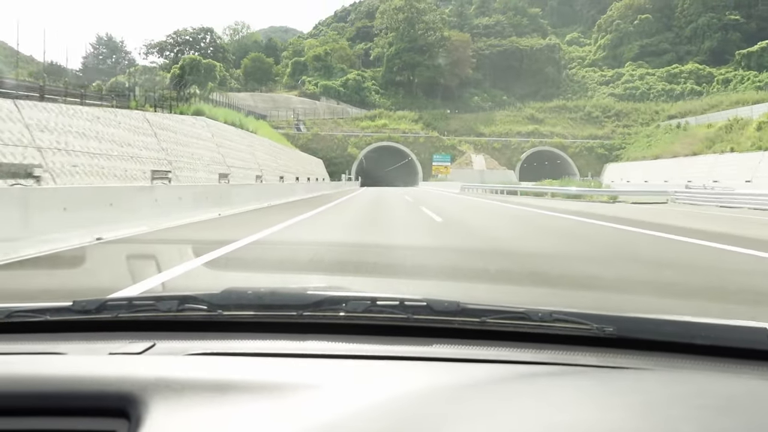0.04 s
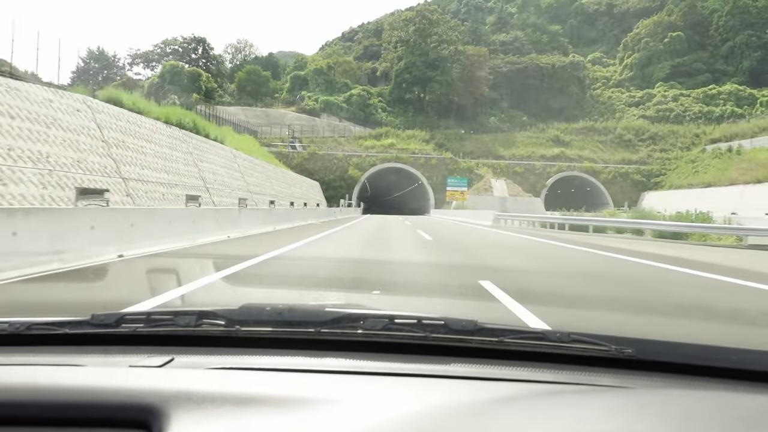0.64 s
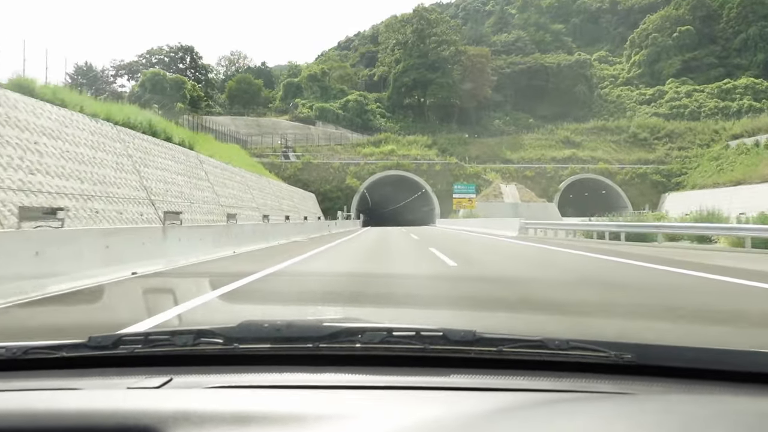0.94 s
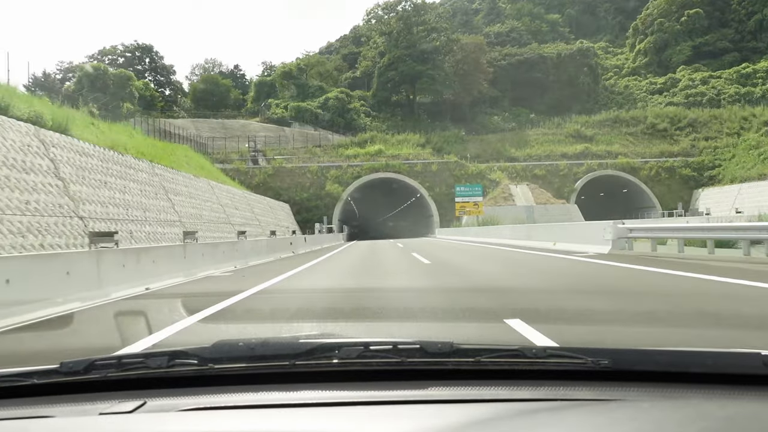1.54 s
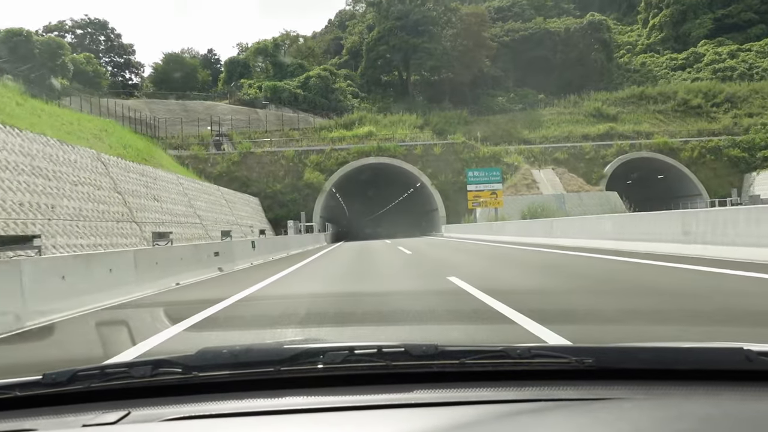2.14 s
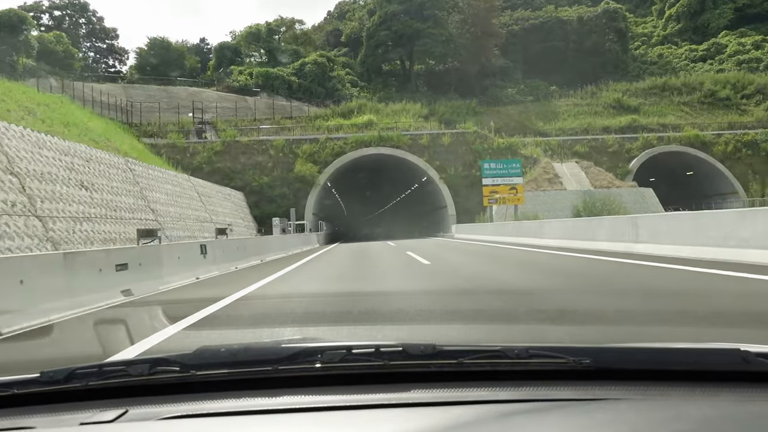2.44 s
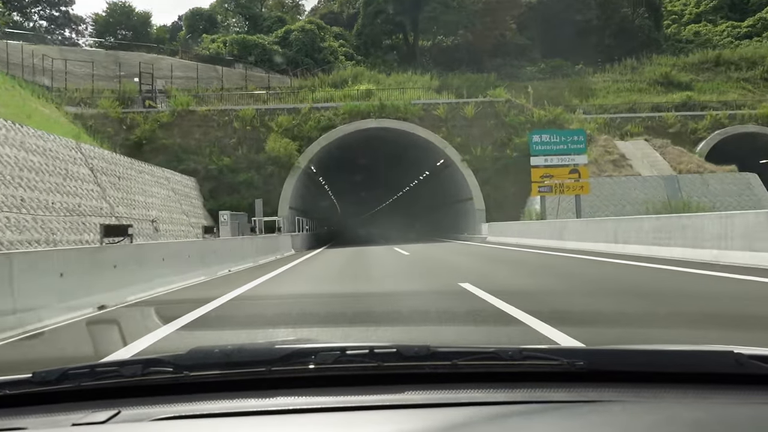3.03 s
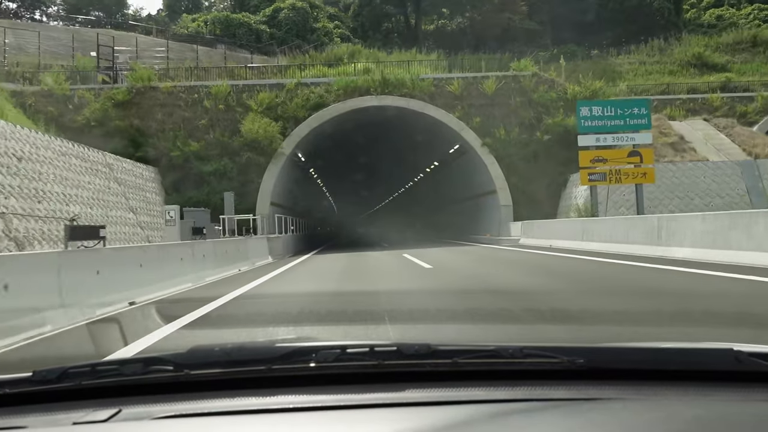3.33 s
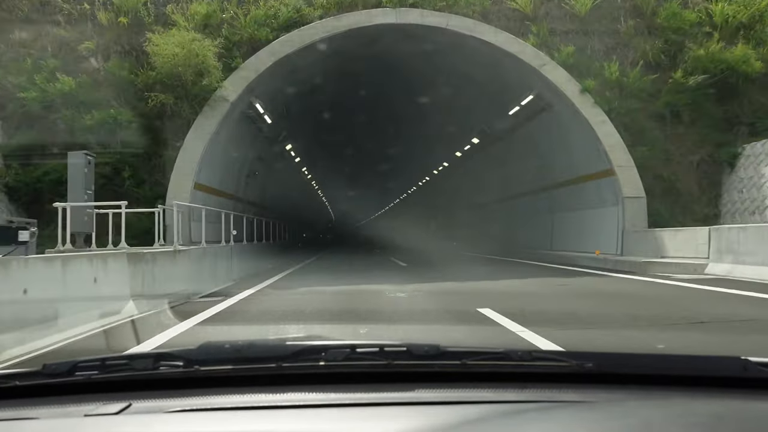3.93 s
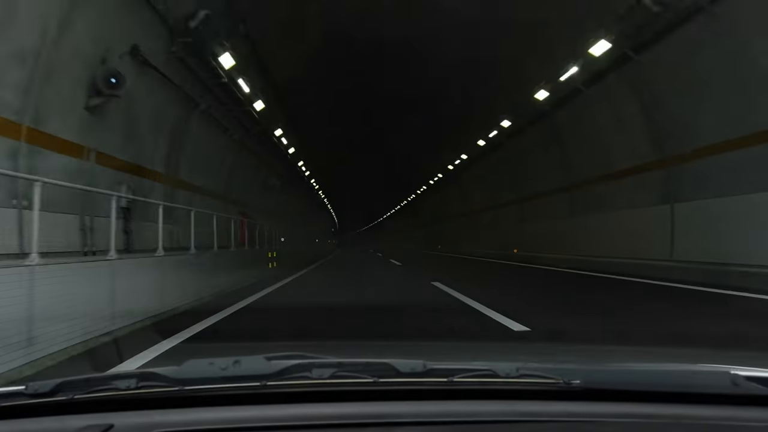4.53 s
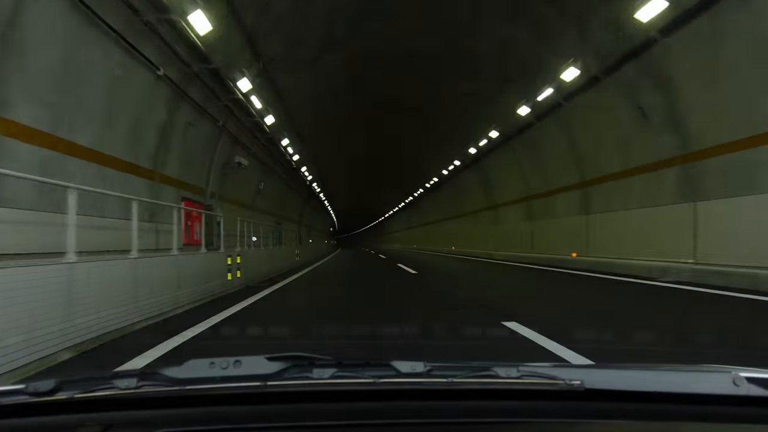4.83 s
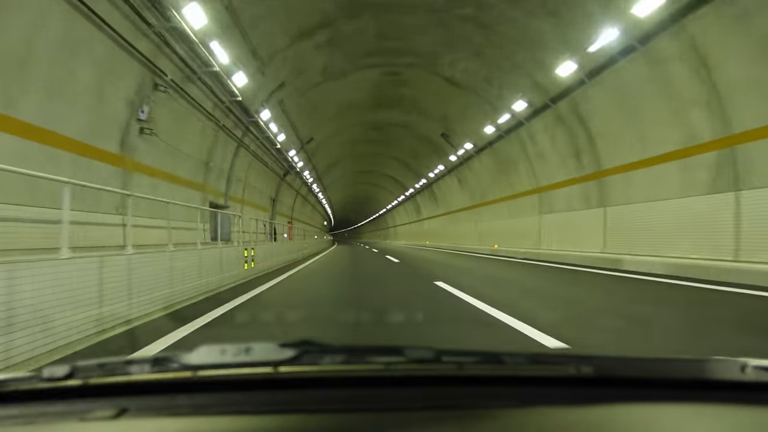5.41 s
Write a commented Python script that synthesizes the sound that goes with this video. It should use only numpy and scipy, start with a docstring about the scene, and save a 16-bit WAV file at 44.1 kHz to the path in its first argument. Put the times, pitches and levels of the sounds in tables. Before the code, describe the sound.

Inside a car at highway speed, engine hum, road rumble and wind hiss continue as a higher tyre hum rises in a tunnel.

```python
"""Inside a car at highway speed, entering a tunnel.
From the start air hisses past the windscreen, the engine hums, and the road shakes body and tyres.
At 1.65 s the asphalt coarsens; near 2 s the engine load eases; ripples then excite the air in the tyres.
From 4.25 s tunnel walls return the ringing of the treads as a hum near 1 kHz, and the hiss grows.
From 4.6 s the road noise dips about 2 dB; the hum swells once near 5.2 s, then continues."""
import sys
import numpy as np
from scipy import signal
from scipy.fft import rfft, irfft
from scipy.io import wavfile
from scipy.ndimage import uniform_filter1d

SR = 44100
rng = np.random.default_rng(int(sys.argv[2]) if len(sys.argv) > 2 else 0)


def store_pcm(level_fs):
    """Save levels as 16-bit WAV."""
    pcm = np.round(np.clip(level_fs, -1, 1) * 32767).astype(np.int16)
    wavfile.write(sys.argv[1], SR, np.atleast_2d(pcm).T)


N = 250047
TIME_S = np.arange(N) / SR
FREQS_HZ = np.maximum(np.arange(N // 2 + 1) * SR / N, 1)

COARSE_START_S, COARSE_FADE_S = 1.65, 0.14
TUNNEL_START_S, TUNNEL_FADE_S = 4.25, 1
ROAD_DIP_START_S, ROAD_DIP_FADE_S = 4.62, 0.23


def from_db(db):
    """Decibels to gain."""
    return 10 ** (np.asarray(db) / 20)


def unit_rms(x):
    """Scale to rms 1."""
    return x / np.sqrt(np.mean(x ** 2) + 1e-20)


def curve(rows):
    """Linear interpolation of (time [s], value) rows."""
    times_s, values = np.transpose(rows)
    return np.interp(TIME_S, times_s, values)


def fade_in(start_s, length_s):
    """Smooth step, 0 to 1."""
    return np.sin(np.pi / 2 * np.clip((TIME_S - start_s) / length_s, 0, 1)) ** 2


def bump(at_s, sigma_s):
    """Gaussian pulse, height 1."""
    return np.exp(-.5 * ((TIME_S - at_s) / sigma_s) ** 2)


def drift(corner_hz):
    """Low-passed noise, rms 1."""
    return unit_rms(irfft(rfft(rng.standard_normal(N)) / (1 + (FREQS_HZ / corner_hz) ** 2), N))


def resonant_noise(spectrum, modes=()):
    """Random forcing through a broad spectrum and narrow resonances, rms 1."""
    hz, level_db = np.transpose(spectrum)
    colour_db = np.interp(np.log(FREQS_HZ), np.log(hz), level_db)
    for centre_hz, width_hz, lift_db in modes:
        colour_db += lift_db / (1 + (2 * (FREQS_HZ - centre_hz) / width_hz) ** 2)
    rolloff = (np.minimum(FREQS_HZ / hz[0], 1) * np.minimum(hz[-1] / FREQS_HZ, 1)) ** 2
    return unit_rms(irfft(rfft(rng.standard_normal(N)) * from_db(colour_db) * rolloff, N))


def enclosure():
    """Open road 0, inside the tunnel 1."""
    return fade_in(TUNNEL_START_S, TUNNEL_FADE_S)


def road_steps_db(coarse_db, dip_db):
    """Cumulative level steps: coarse asphalt, then a level dip in the tunnel."""
    return (coarse_db * fade_in(COARSE_START_S, COARSE_FADE_S)
            + dip_db * fade_in(ROAD_DIP_START_S, ROAD_DIP_FADE_S))


def wind_hiss(open_db=-49, tunnel_lift_db=5, flutter_db=1.03, treble_hz=10000):
    """Eddies make the air hiss flutter and spit; louder, steadier and duller in the tunnel."""
    # head wind gusts: (time [s], level change [dB])
    gusts = [(0.2, 1.1), (0.85, -1.7), (1.15, 0.7), (1.5, -1.7), (2.9, 2.1), (3.85, 1.1), (4.3, 0)]
    # brief spits of the air flow: (time [s], rise [dB])
    spits = [(1.163, 4), (1.208, 3), (2.29, 4.5), (2.803, 3), (2.913, 4)]
    # air flow noise: (frequency [Hz], density [dB])
    spectrum = [(1500, 0), (2500, 4), (3000, 2), (3400, -.7), (4100, -1.5), (5100, -3.4), (6200, -.8),
                (7500, .1), (8400, -2.2), (8900, -5.4), (10000, -7.7), (12000, -13), (14000, -17),
                (15600, -22)]
    hiss = resonant_noise(spectrum)
    treble = irfft(rfft(hiss) * (1 - 1 / (1 + (FREQS_HZ / treble_hz) ** 8)), N)
    shelter = 0.37 * enclosure()
    spit_db = sum(rise_db * bump(at_s, sigma_s=0.0048) for at_s, rise_db in spits)
    level_db = open_db + curve(gusts) + tunnel_lift_db * enclosure() + spit_db
    level_db += flutter_db * (1 - shelter) * drift(corner_hz=28)
    extra_treble = from_db(0.5 * spit_db) - 1 - shelter
    return from_db(level_db) * (hiss + extra_treble * treble)


def engine_hum(coast_hz=92.7, pull_hz_per_db=0.1, wander_hz=0.39, waver_db=0.9, octave_db=-17):
    """Firing tone and weak octave boom in the cabin; level and pitch sink as the load eases."""
    # firing tone under changing load: (time [s], level [dB])
    load = [(0, -22.3), (.6, -19.7), (1.6, -27), (1.98, -23), (2.2, -31.5), (5.67, -34.5)]
    level_db = curve(load)
    firing_hz = coast_hz + pull_hz_per_db * (level_db - level_db.min())
    firing_hz += wander_hz * drift(corner_hz=4.0)
    phase = 2 * np.pi * np.cumsum(firing_hz) / SR
    tone = np.sqrt(2) * (np.sin(phase) + from_db(octave_db) * np.sin(2 * phase))
    return from_db(level_db + waver_db * drift(corner_hz=4.3)) * tone


def body_shake(level_db=-19.2, compression=0.22):
    """The sprung body trembles at tens of hertz; dampers restrain the larger swings."""
    # body vibration: (frequency [Hz], density [dB])
    spectrum = [(5, -26), (13, -2), (22, -2), (28, 1.5), (42, -4), (53, -.5), (72, -9.5), (100, -13),
                (150, -30)]
    shake = resonant_noise(spectrum)
    local_power = uniform_filter1d(shake ** 2, size=SR // 12)
    return from_db(level_db) * unit_rms(shake / local_power ** (compression / 2))


def road_rumble(level_db=-22.5):
    """Asphalt texture shakes the floor pan, which drives the cabin modes."""
    # floor pan rumble: (frequency [Hz], density [dB])
    spectrum = [(60, -12.5), (105, -1), (135, -1.5), (180, -4.5), (218, -7), (320, -7), (440, -9),
                (560, -12.5), (750, -19.5), (1500, -59)]
    # cabin resonances: (centre [Hz], width [Hz], lift [dB])
    modes = [(143.3, 15, 5), (202, 11, 3.5), (388, 54, 1.5), (484, 21, 3.5)]
    road_db = road_steps_db(coarse_db=1.27, dip_db=-2.5)
    return from_db(level_db + road_db) * resonant_noise(spectrum, modes)


def tyre_cavities(level_db=-27.0, ripple_db=4, ripple_start_s=2.23, ripple_end_s=3.06):
    """The air ring in each tyre resonates near 250 Hz, most on rippled road."""
    # tyre air band: (frequency [Hz], density [dB])
    spectrum = [(215, -10), (235, 0), (280, 0), (310, -12)]
    # cavity resonance, split by rolling: (centre [Hz], width [Hz], lift [dB])
    modes = [(236, 11, 13), (259, 11, 12), (278, 12, 9.5)]
    rippled = fade_in(ripple_start_s, length_s=0.16) - fade_in(ripple_end_s, length_s=0.16)
    road_db = road_steps_db(coarse_db=-0.77, dip_db=-2.2) + ripple_db * rippled
    return from_db(level_db + road_db) * resonant_noise(spectrum, modes)


def tread_roar(level_db=-32.0, patchiness_db=0.83):
    """Tread blocks slap the road and ring, varying by patch, surging on meeting coarse asphalt."""
    # tread slap: (frequency [Hz], density [dB])
    spectrum = [(350, -34), (620, -2.5), (760, -1), (950, -6.5), (1070, -4.5), (1220, -14.5), (1750, -14.5),
                (2450, -23), (2900, -28), (3300, -34.5), (5000, -45)]
    # tread resonances: (centre [Hz], width [Hz], lift [dB])
    modes = [(661, 37, 7.4), (749, 25, 6.5), (886, 10.4, 9.3), (1328, 74, 6.9), (1640, 54, 2.1),
             (1960, 41, 2.9), (2310, 70, 2)]
    road_db = road_steps_db(coarse_db=1.5, dip_db=-1.5) + patchiness_db * drift(corner_hz=13)
    surge_db = 0.5 * bump(COARSE_START_S + COARSE_FADE_S, sigma_s=0.095)
    return from_db(level_db + road_db + surge_db) * resonant_noise(spectrum, modes)


def tunnel_hum(level_db=-22.5, swell_db=3.3, waver_db=0.43):
    """The walls return the pipe tones of the tread grooves, smeared into a hum near 1 kHz."""
    # reflected tyre noise: (frequency [Hz], density [dB])
    spectrum = [(560, -28), (790, -15.5), (870, -2.5), (1070, -2), (1170, -9), (1420, -11.5), (1800, -14.3),
                (2150, -21), (2650, -25.8), (3300, -36), (4500, -47), (9000, -66)]
    # reflected groove tones: (centre [Hz], width [Hz], lift [dB])
    modes = [(672, 45, 16), (780, 30, 7.6), (868, 22, 6.1), (944, 38, 4.9), (1059, 60, 4.2),
             (1273, 19, 6.6), (1317, 66, 7.5), (1572, 17, 11.4), (1820, 64, 5.2), (2010, 32, 3.4)]
    change_db = swell_db * bump(at_s=5.18, sigma_s=0.05) + waver_db * drift(corner_hz=8.0)
    return enclosure() * from_db(level_db + change_db) * resonant_noise(spectrum, modes)


def scene():
    """Mono sum at a microphone above the dashboard."""
    tyres = road_rumble() + tyre_cavities() + tread_roar() + tunnel_hum()
    return (engine_hum() + body_shake() + tyres + wind_hiss())[None]


def record(dry):
    """Steep elliptic low-pass."""
    cutoff_hz = 15700
    return signal.sosfilt(signal.ellip(12, .1, 90, cutoff_hz, fs=SR, output="sos"), dry)


dry = scene()
out = record(dry)
store_pcm(out)
```